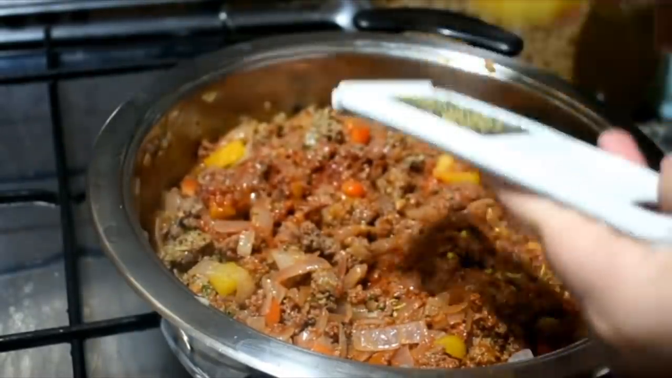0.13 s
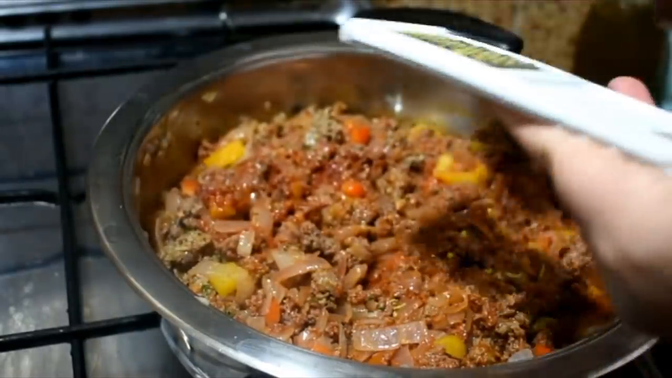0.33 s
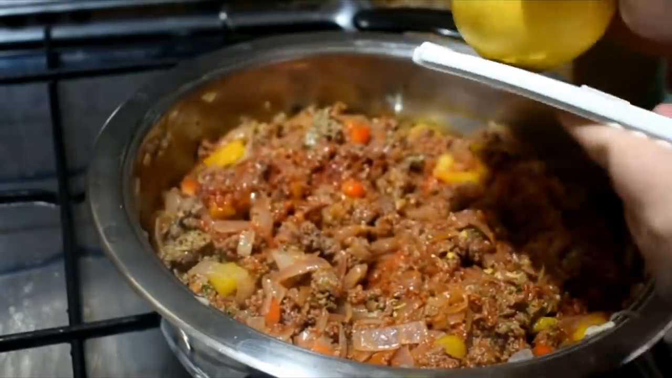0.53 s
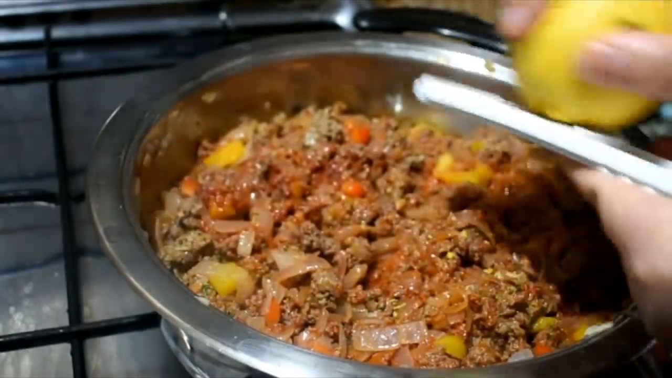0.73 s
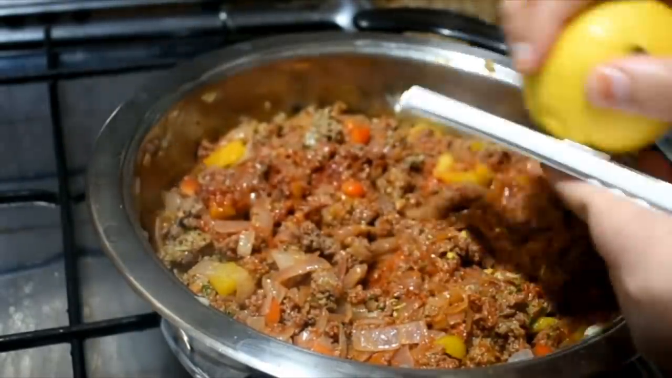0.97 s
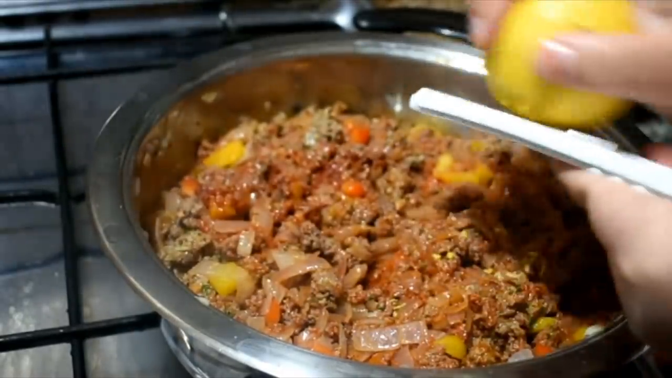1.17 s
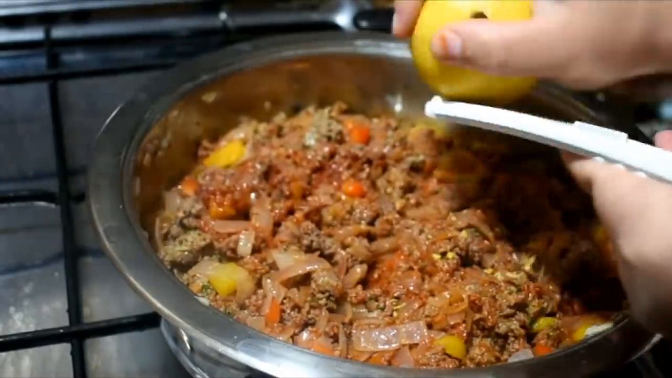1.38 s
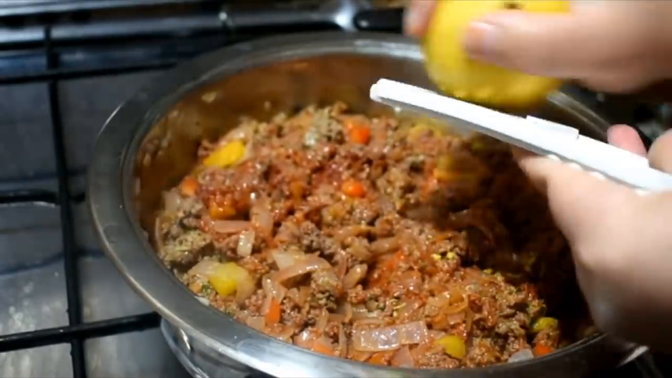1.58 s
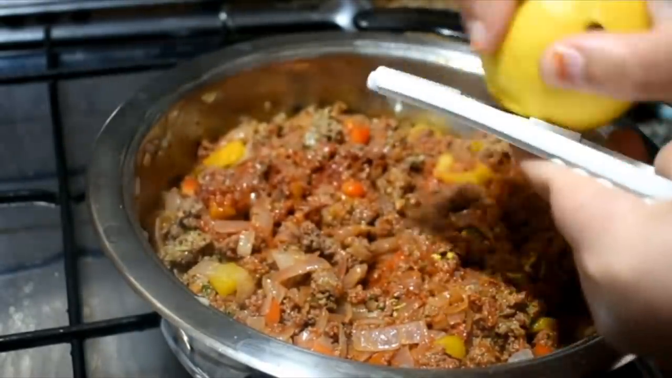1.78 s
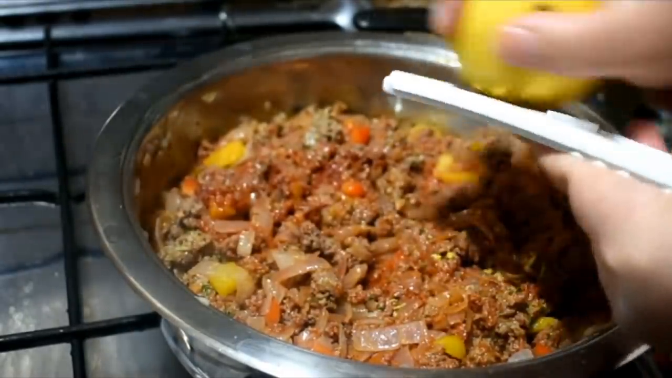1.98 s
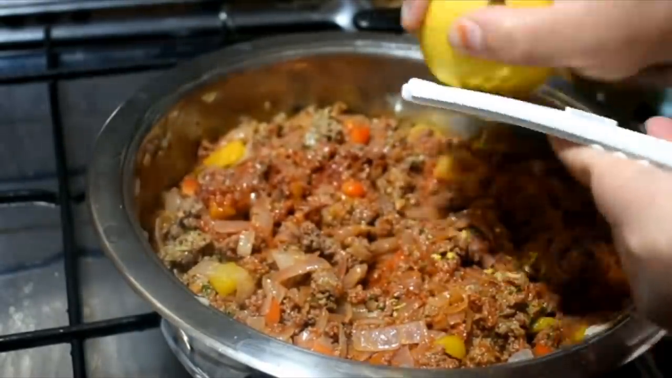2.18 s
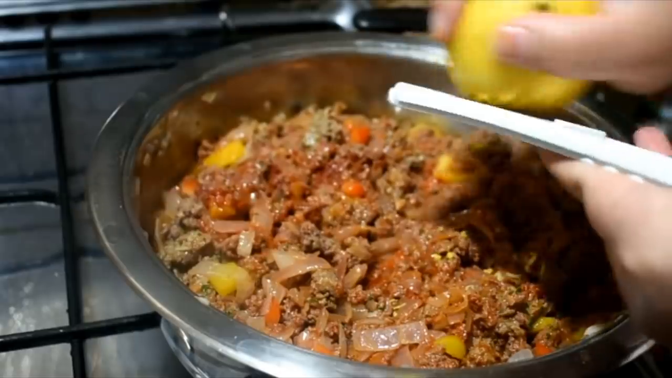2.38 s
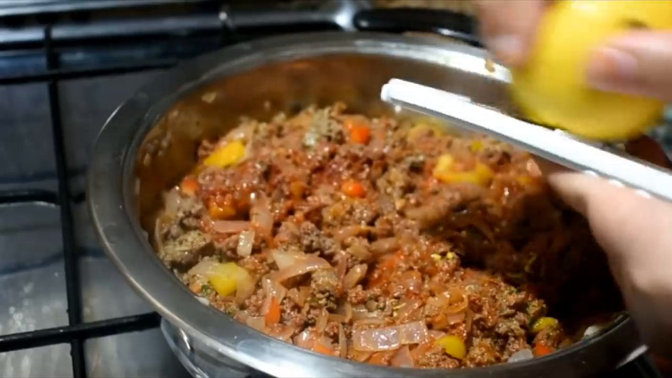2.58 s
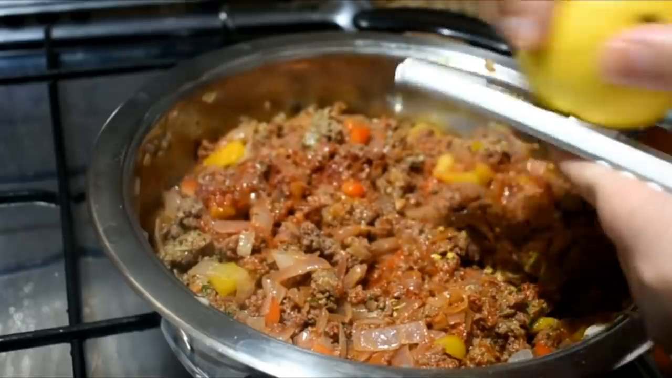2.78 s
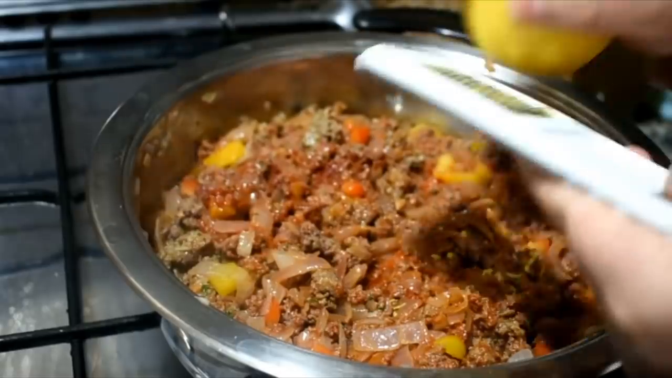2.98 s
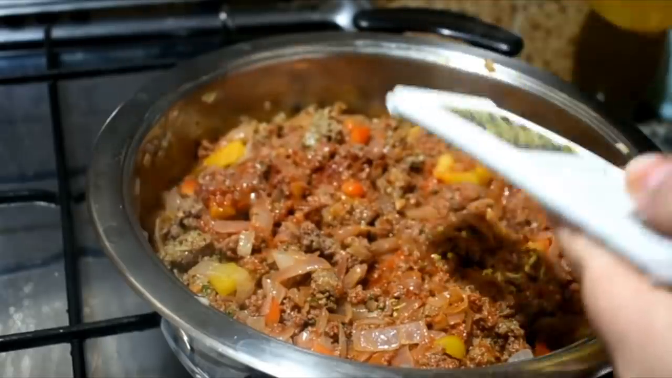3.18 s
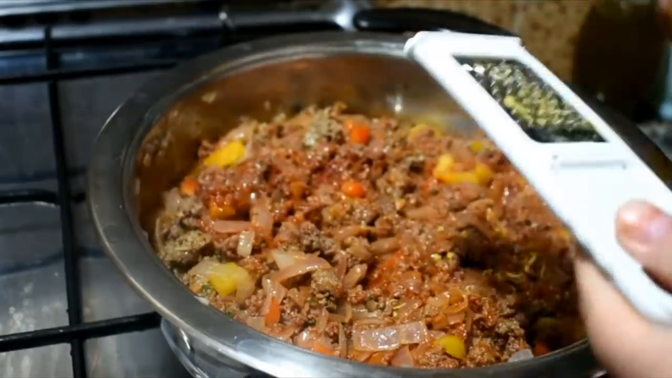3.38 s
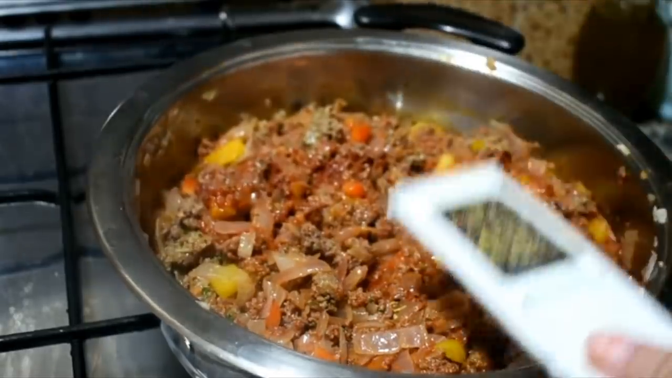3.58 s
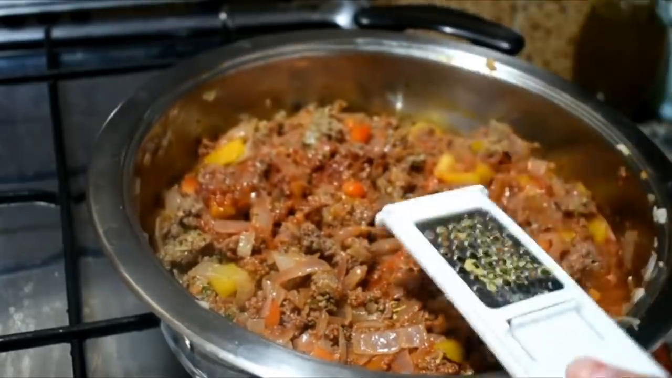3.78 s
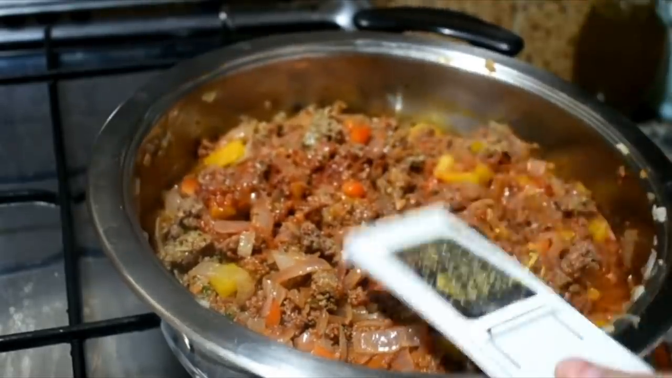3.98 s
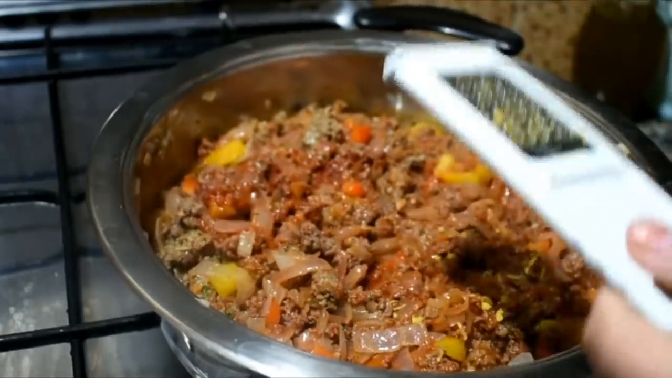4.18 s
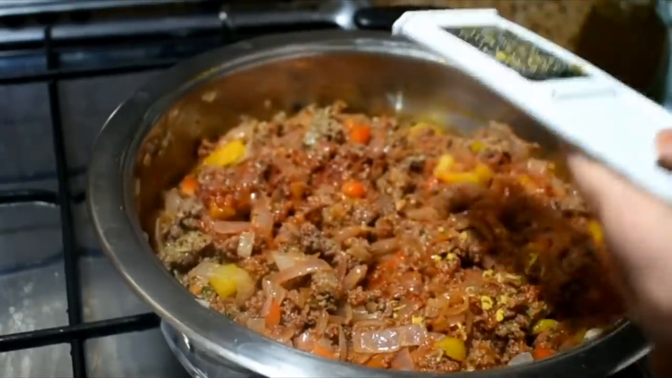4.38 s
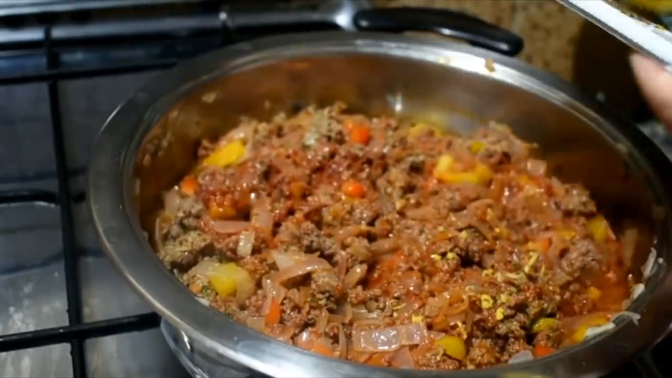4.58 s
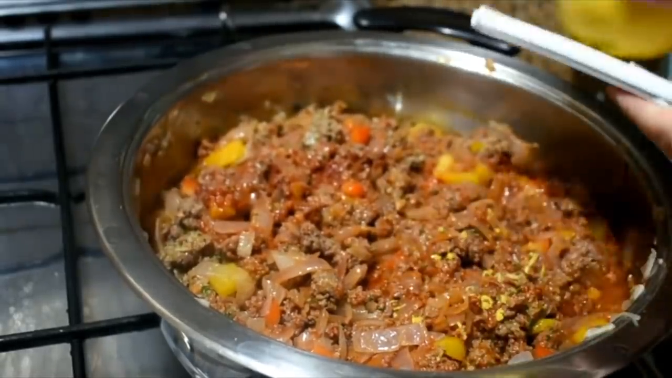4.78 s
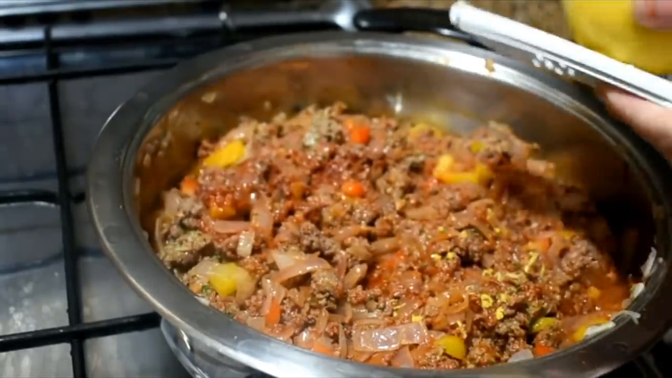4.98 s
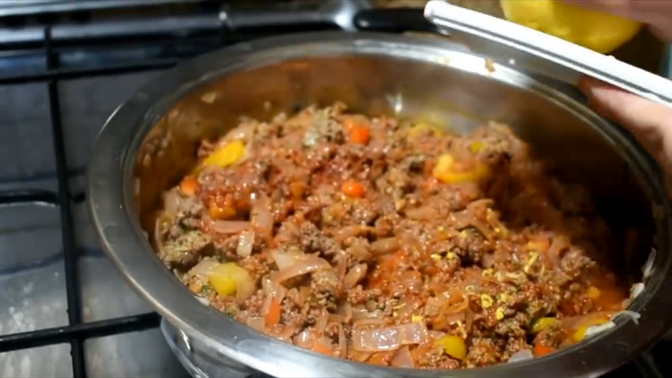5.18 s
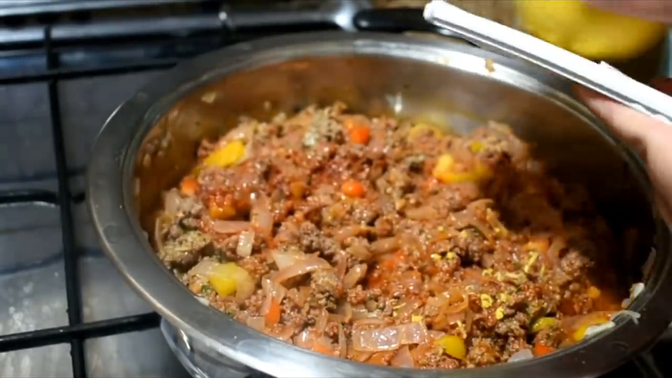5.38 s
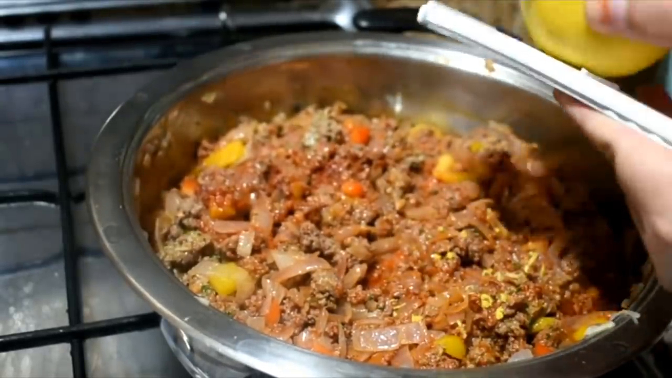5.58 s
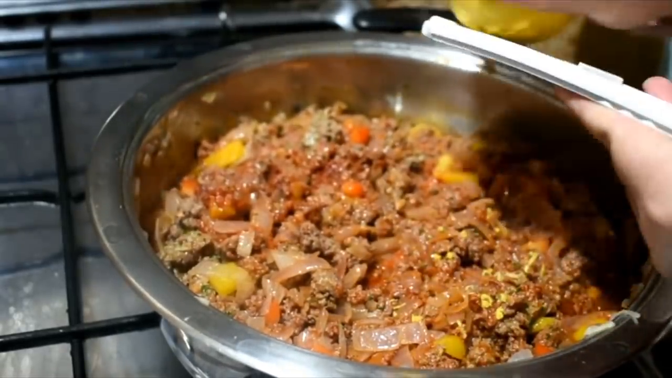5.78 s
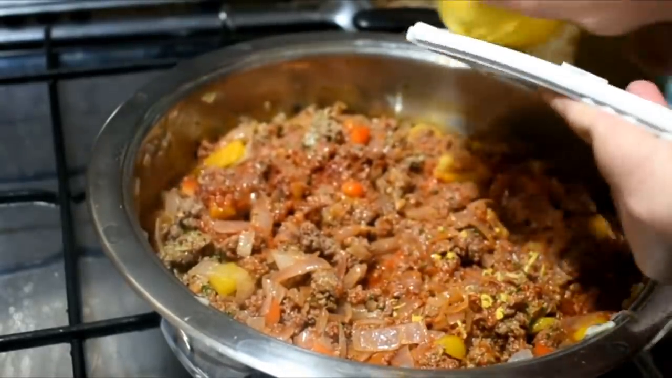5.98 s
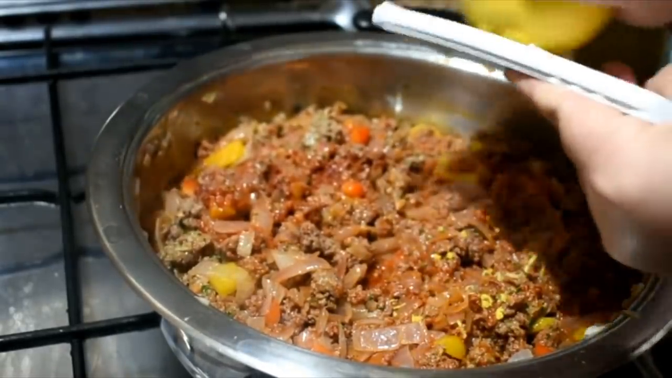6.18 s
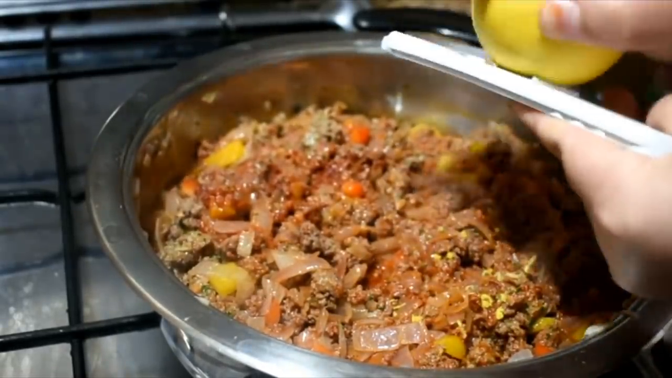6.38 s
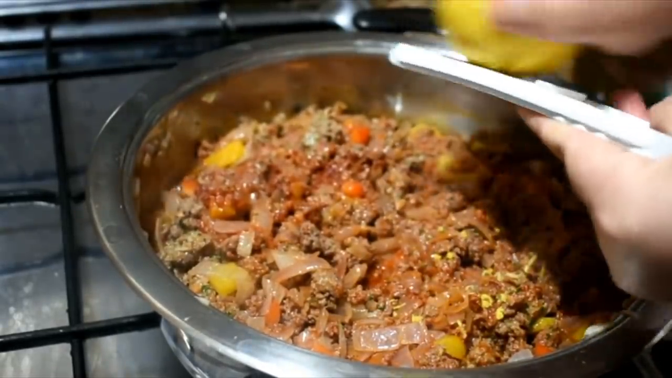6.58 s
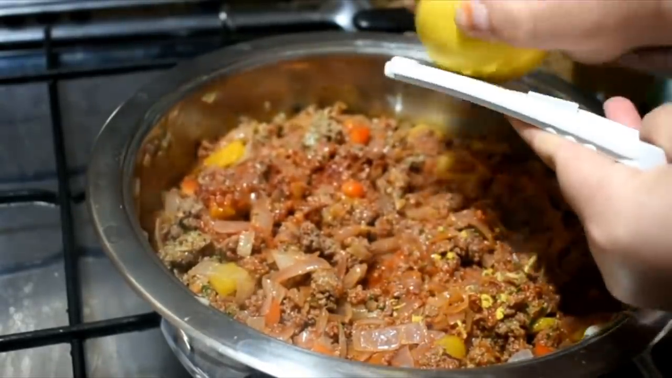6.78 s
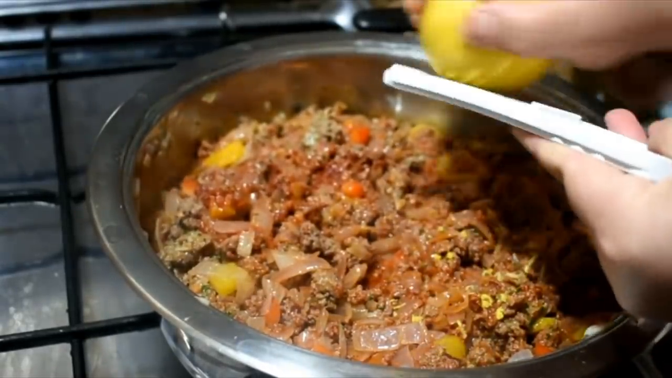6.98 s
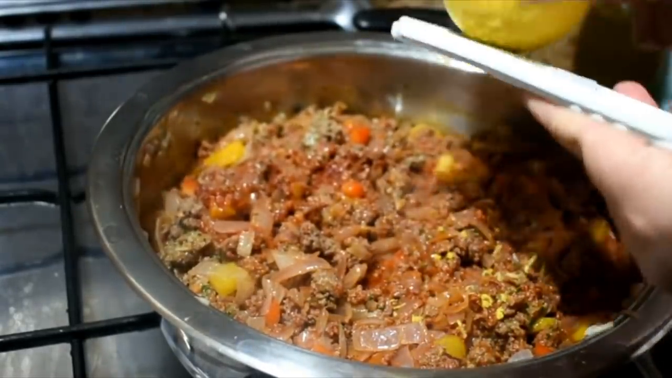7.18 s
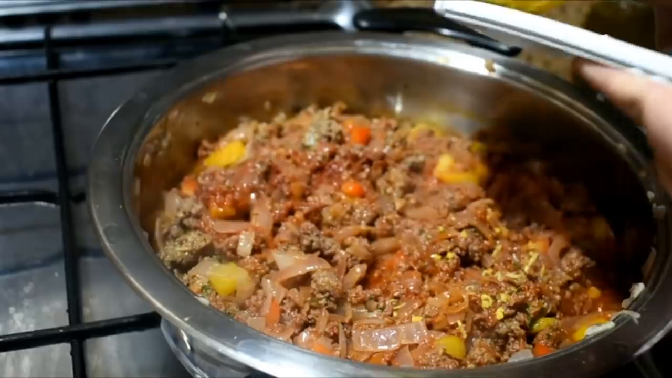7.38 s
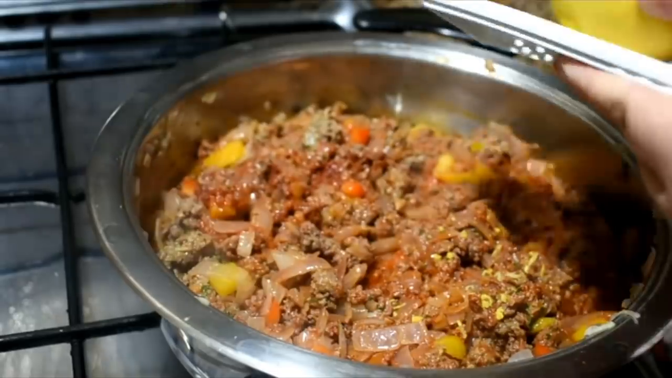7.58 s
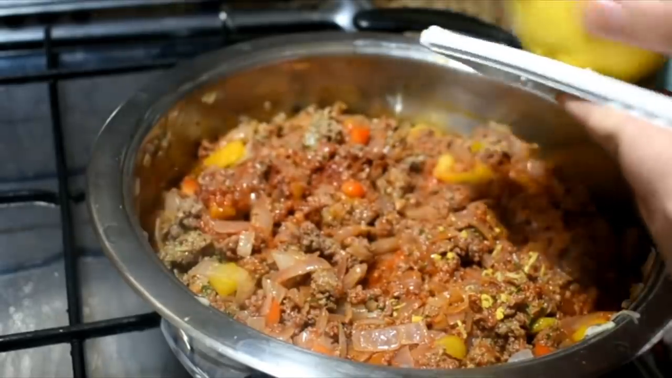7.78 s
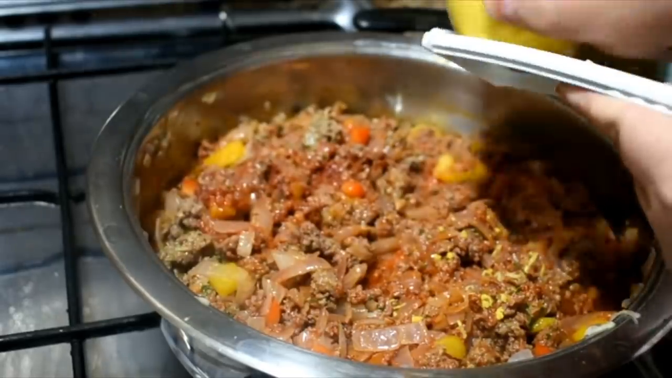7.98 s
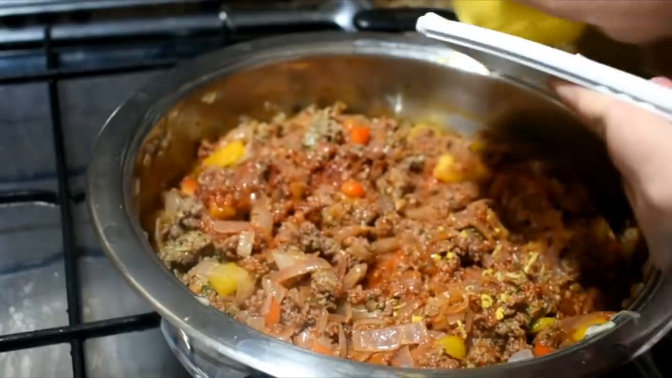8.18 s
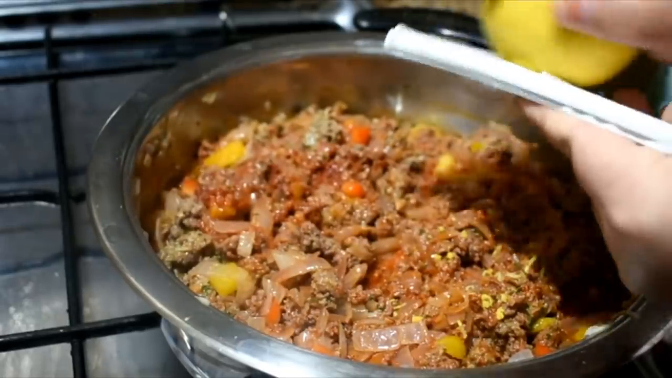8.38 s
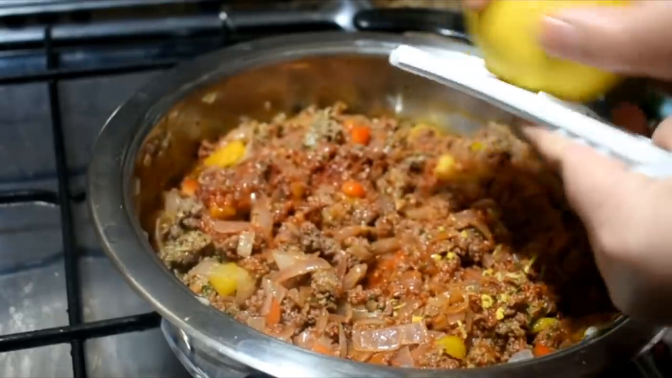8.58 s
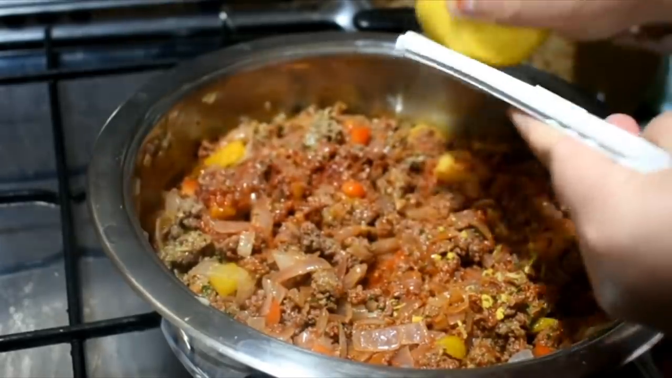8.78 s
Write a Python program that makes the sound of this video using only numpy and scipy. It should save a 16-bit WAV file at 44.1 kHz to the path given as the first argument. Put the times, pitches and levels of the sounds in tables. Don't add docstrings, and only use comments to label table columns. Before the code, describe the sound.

A close, thin-bass microphone in a kitchen with steady extractor air, a faint motor hum and a thin whine. From about 0.3 s a lemon is rubbed on a fine handheld grater: dry, bright rasps under a tenth of a second, strong cutting strokes roughly every quarter second, with quieter return scrapes between and occasional tiny fibre snaps. At 2.5 s the strokes stop. Loud raps of the plastic frame on the steel pan rim crack at 3.1, 3.4 and 3.6 s, the first with a quick bounce, ringing briefly; duller, gritty knocks of the pan on the iron grid come between and after, one sharper at 3.7 s, with a low blurred thud beneath. Small knocks trail to 4.1 s. Light scraping resumes at 4.4 s, strengthens by 5.5 s, breaks briefly around 6.6 to 7 s, then continues evenly until about 8.3 s. The hum fades, ending in silence near 8.8 s.

```python
import sys
import numpy as np
from scipy import signal
from scipy.fft import rfft, irfft, next_fast_len
from scipy.io import wavfile
from scipy.ndimage import uniform_filter1d

SR = 44100
rng = np.random.default_rng(int(sys.argv[2]) if len(sys.argv) > 2 else 0)


def rack_gain(trim_db):
    fader = np.asarray(trim_db, float)
    return 10 ** (fader / 20)


def to_wav(s):
    ch = np.atleast_2d(s).T
    pcm = np.round(np.clip(ch, -1, 1) * 32767)
    wavfile.write(sys.argv[1], SR, pcm.astype(np.int16))


N = 390108

T = np.arange(N) / SR
SIZE = next_fast_len(N + SR)
HZ = np.maximum(np.arange(SIZE // 2 + 1) * SR / SIZE, 1)
TOP_HZ = 15800

# (time [s], peak [dB], rattle [s], treble [dB], thud [dB])
RAPS = [
    (3.125, -6.5, 0.011, -2.5, -8.5),
    (3.136, -12.5, 0.005, -5, -7.5),
    (3.16, -26, 0.011, -3.5, 18),
    (3.368, -7, 0.017, 1, -2.5),
    (3.597, -7, 0.0091, 1.5, 2),
    (3.619, -23.5, 0.006, -11, 9),
]
# (time [s], peak [dB], treble [dB], grit [dB], thud [dB])
ROCKS = [(3.224, -29, -9, 3, 17), (3.295, -21, 1.5, 4, -10), (3.519, -17.5, 9, 1, -5.5),
         (3.568, -22.5, 2, -4, 9), (3.649, -26.5, -6, 0, 11), (3.689, -24, -14, -5, 0),
         (3.720, -13.5, 16.5, 9, -13.5), (3.737, -27, 16, 11, -14), (3.9, -42, 9, -3.5, 13),
         (4.09, -27.5, 0, -7, 8.5), (4.596, -34, -3, 1, 11), (4.823, -39, -7, -1, 5)]


def unit(x):
    return x / np.sqrt(np.mean(x ** 2))


def shape(points):
    hz, db = np.transpose(points)
    return rack_gain(np.interp(np.log(HZ), np.log(hz), db))


def bumps(peaks):
    return np.sqrt(1 + sum(rack_gain(2 * db) / (1 + (2 * (HZ - hz) / wide) ** 2) for hz, wide, db in peaks))


def causal(gain):
    cepstrum = irfft(np.log(gain + 1e-6), SIZE)
    cepstrum[1:SIZE // 2] *= 2
    cepstrum[SIZE // 2 + 1:] = 0
    return np.exp(rfft(cepstrum))


def colour(x, gain):
    return irfft(rfft(x, SIZE) * gain, SIZE)[:N]


def walk(rate):
    hold = int(SR / rate)
    steps = np.repeat(rng.standard_normal(N // hold + 1), hold)
    return unit(uniform_filter1d(steps, hold)[:N])


def add(out, start, sound):
    i = int(start * SR)
    out[i:i + len(sound)] += sound[:N - i]


def decay(t, t60):
    return np.exp(-np.log(1000) * t / t60)


def zesting():
    # (frequency [Hz], level [dB per Hz])
    teeth = [(350, -23), (600, -9.5), (812, -20.5), (881, -17), (1180, -7), (2090, -4), (2610, -4),
             (3630, -6.5), (3990, -4), (4910, -6), (10300, -11.5), (14100, -18.5), (16000, -31.5)]
    # (frequency [Hz], width [Hz], level [dB])
    plate_modes = [(2630, 200, -2), (3500, 250, -2), (4050, 250, 0), (4580, 150, -3), (5140, 150, -3),
                   (9090, 700, -4)]
    # (start [s], length [s], level [dB])
    cuts = [(0.375, 0.046, -47), (0.611, 0.065, -45.5), (0.877, 0.079, -48), (1.136, 0.078, -46),
            (1.425, 0.063, -44.5), (1.7, 0.063, -43), (1.951, 0.07, -43.5), (2.203, 0.068, -42.5),
            (2.452, 0.059, -43.5), (4.535, 0.066, -56.5), (4.98, 0.064, -49.5), (5.25, 0.086, -50.5),
            (5.518, 0.064, -45.5), (5.778, 0.06, -42.5), (6.024, 0.073, -46), (6.277, 0.064, -45.5),
            (6.519, 0.07, -43.5), (7.2, 0.073, -45.5), (7.458, 0.078, -46), (7.717, 0.075, -49),
            (7.983, 0.076, -47), (8.248, 0.059, -47)]
    # (start [s], length [s], level [dB])
    returns = [(0.327, 0.06, -57.5), (0.456, 0.088, -53.5), (0.754, 0.067, -52.5), (1.024, 0.064, -48),
               (1.3, 0.062, -52.5), (1.563, 0.074, -52.5), (1.814, 0.083, -49.5), (2.076, 0.071, -48.5),
               (2.337, 0.057, -49), (4.410, 0.04, -54), (4.664, 0.045, -55.5), (4.853, 0.05, -60),
               (5.097, 0.07, -55.5), (5.38, 0.083, -55.5), (5.616, 0.1, -55), (5.894, 0.07, -50),
               (6.155, 0.062, -51), (6.404, 0.059, -52), (7.027, 0.13, -55.5), (7.308, 0.094, -52),
               (7.572, 0.089, -52.5), (7.846, 0.077, -52.5), (8.12, 0.064, -52)]
    # (time [s], level [dB])
    weight = [(.35, -2.5), (.8, -0.5), (2.5, 0.5), (4.5, -3.5), (5.3, -6), (5.9, -0.5), (6.5, -2),
              (7.2, -2), (8.3, -2)]
    # share of the stroke spent rising, plate body dB, tearing dB
    cut, back = (0.25, -5.5, -3), (0.37, -3.5, -3.1)
    skim_tear = 0.3

    plate = shape(teeth) * bumps(plate_modes)
    grip_db = 0.72 * walk(70)
    parts = np.zeros((3, N))
    for centre in 600 * 2 ** (np.arange(20) / 4):
        patch_db = 0.9 * walk(30) + 2.2 * walk(150)
        clicks = rng.standard_normal(N) * rack_gain(3.0 * np.minimum(rng.standard_exponential(N), 6))
        share = np.exp(-(4 * np.log2(HZ / centre)) ** 2 * 1.4)
        layer = 1 if centre < 3000 else 2 if centre > 8000 else 0
        parts[layer] += rack_gain(patch_db + grip_db) * colour(clicks, plate * share)

    push = np.zeros((3, N))
    strokes = [(*row, *cut) for row in cuts] + [(*row, *back) for row in returns]
    for start, length, db, bite, body_db, tear_db in strokes:
        weight_db = np.interp(start, *np.transpose(weight))
        u = np.linspace(0, 1, int(1.34 * length * SR))
        rise = np.sin(np.pi / 2 * np.minimum(u / bite, 1)) ** 1.42
        swell = rise * np.cos(np.pi / 2 * u ** 2.9) ** 2.54
        for row, extra_db in zip(push, (0, body_db + weight_db, tear_db - skim_tear * weight_db)):
            add(row, start - 0.001, swell * rack_gain(db + extra_db + 1.0))
    push += np.array([[0.16], [0.16], [0.24]]) * uniform_filter1d(push, int(0.16 * SR), axis=1)
    return sum(unit(part) * level for part, level in zip(parts, push))


def snags():
    # (time [s], peak [dB], frequency [Hz])
    fibres = [(0.025, -30.5, 2150), (0.3965, -35, 4350), (0.409, -31, 4440), (0.531, -36, 2130),
              (0.952, -18.5, 9000), (1.1404, -24.5, 4350), (1.3437, -24, 4250), (1.344, -26, 12000),
              (1.879, -32, 4300), (0.668, -26, 9000), (2.214, -21, 6230), (4.4229, -31.5, 5000),
              (4.5644, -33, 3630), (4.587, -28.5, 7000), (5.0942, -30, 8200), (5.269, -29.5, 4600),
              (5.5316, -25, 10200), (5.905, -26.5, 9050), (6.531, -36, 3970)]
    out, t = np.zeros(N), np.arange(600) / SR
    for (start, db, hz), noise in zip(fibres, rng.standard_normal((len(fibres), 600))):
        band = signal.butter(2, [hz / 1.2, min(hz * 1.36, 18000)], "band", fs=SR, output="sos")
        tick = unit(signal.sosfilt(band, noise)) + 0.3 * np.gradient(noise)
        tick *= t / 0.0031 * np.exp(1 - t / 0.0022)
        add(out, start - 0.0015, tick * rack_gain(db - 14.5))
    return out


def ring(hz, modes, luck, rise, treble_db, scatter_db):
    t, hz = np.arange(SR // 3)[:, None] / SR, np.array(hz)
    db, t60 = np.transpose(modes)
    gain = rack_gain(db + scatter_db * luck[0] + treble_db * np.log2(hz / 2000) / 2)
    waver = 1 + 0.4 * np.sin(2 * np.pi * (40 + 15 * luck[2]) * t + 3 * luck[3])
    swing = (1 - np.exp(-t / rise)) * decay(t, np.maximum(t60, 0.01) * rack_gain(2.1 * luck[4])) * waver
    swing *= np.cos(1.5 * np.pi * t)
    return (swing * np.sin(2 * np.pi * hz * t + 3 * luck[1])) @ gain


def chatter(length, noise):
    t = np.arange(len(noise)) / SR
    push = noise * np.minimum(t / 0.0026, 1) * np.exp(-(t / length) ** 2)
    return push / np.sqrt(np.sum(push ** 2))


def raps():
    rim_hz = [620, 1132, 1481, 1869, 1891, 2424, 2502, 2719, 3020, 3146, 3227, 3465, 3640, 3890, 4134, 4630,
              5861, 6160, 7180, 7503, 7970, 8807, 10410, 11195, 12000, 12830]
    # (level [dB], t60 [s])
    rim = [(-16, 0.12), (-8, 0.092), (-14, .2), (-7, 0.34), (-9, 0.3), (-10, 0.2), (-18, 0.27), (-21.5, .2),
           (-19, .1), (-4.5, 0.11), (-5.5, 0.28), (-22.5, 0.16), (-13.5, 0.089), (-7.5, .14), (-17.5, 0.24),
           (-26, 0.17), (-14.5, .1), (-5, 0.28), (-11, 0.17), (-19.5, .18), (-7, 0.11), (-18.5, 0.12),
           (-20, .16), (-23, 0.16), (-17, 0.077), (-25, .14)]
    # (frequency [Hz], level [dB per Hz])
    crack_tone = [(180, -53.5), (300, -27), (1800, -9), (2100, -14), (3230, -7.5), (4380, -11.5),
                  (6030, -13), (13000, -16), (15400, -31.5), (16500, -55.5)]
    # (frequency [Hz], width [Hz], level [dB])
    frame = [(1930, 280, -0.5), (3170, 170, 14), (6080, 230, 7.5), (7700, 480, -2.5)]
    settled_s, settled_db, settled_t60, pair_hz = 3.3, -8, -0.1, 1880
    pair = np.abs(np.array(rim_hz) - pair_hz) < 50

    out, crack = np.zeros(N), np.zeros(N)
    for (start, db, length, treble_db, _), luck in zip(RAPS, rng.standard_normal((len(RAPS), 200, 30))):
        damped = np.array(rim) + np.outer((start > settled_s) * pair, (settled_db, settled_t60))
        blow = ring(rim_hz, damped, luck[:, :len(rim)], length / 3, treble_db, scatter_db=4.2)
        add(out, start, rack_gain(db - 13.0) * blow)
        add(crack, start, rack_gain(db + 32) * chatter(length, luck.ravel()))
        add(crack, start, rack_gain(db + 14.5) * chatter(0.022, luck.ravel()[::-1]))
    return out + colour(crack, causal(shape(crack_tone) * bumps(frame)))


def rocks():
    grid_hz = [680, 915, 1340, 1568, 2130, 2435, 2680, 3160, 3760, 4490, 5450, 6200, 7250]
    # (level [dB], t60 [s])
    grid_modes = [(-11, .07), (-3, .08), (-9, .08), (-8, .09), (-11, .06), (-4, .08), (1, .09), (-8, .05),
                  (-15, .03), (-16, .03), (-19, .025), (-17, .025), (-19, .025)]
    out, grit, wake = np.zeros((3, N))
    for (start, db, treble_db, grit_db, _), luck in zip(ROCKS, rng.standard_normal((len(ROCKS), 300, 30))):
        knock = ring(grid_hz, grid_modes, luck[:, :len(grid_modes)], 0.0011, treble_db, scatter_db=-0.4)
        add(out, start - 0.002, rack_gain(db - 9.5) * knock)
        add(grit, start - 0.002, rack_gain(db + 13.5 + grit_db) * chatter(0.0087, luck.ravel()))
        add(wake, start, rack_gain(db + 16) * chatter(0.053, luck.ravel()[::-1]))
    body = bumps([(875, 130, 7.2), (1490, 370, 4.6), (2590, 710, 5.5)]) / (1 + (450 / HZ) ** 4)
    gritty = colour(grit, causal(body / (1 + (HZ / 4300) ** 4)))
    shudder = colour(wake, causal(body / (1 + (HZ / 3300) ** 6)))
    return out + gritty + shudder


def belly():
    # (frequency [Hz], level [dB per Hz])
    low_body = [(60, -35), (120, -18), (170, -9.5), (225, -2.5), (268, 5), (322, -3.5), (450, -10.5),
                (700, -3), (1200, -41.5)]
    push, t = np.zeros(N), np.arange(SR) / SR
    for start, db, *_, thud_db in RAPS + ROCKS:
        add(push, start, rack_gain(db + thud_db) * (1 - np.exp(-t / 0.045)) * decay(t, 0.82))
    return rack_gain(-35) * push * unit(colour(rng.standard_normal(N), shape(low_body)))


def extractor():
    # (frequency [Hz], level [dB per Hz])
    air_tone = [(15, -58.5), (25, -46.5), (64, -38), (92, -26.5), (180, -19.5), (200, -15), (277, -7),
                (405, -11.5), (818, -8.5), (887, -7), (1190, -8), (1700, -7.5), (1940, -7.5), (9320, -15.5),
                (16000, -31.5)]
    # (frequency [Hz], width [Hz], level [dB])
    duct = [(224.3, 5.1, 4.5), (268, 27, -5), (582, 14, 9), (763, 52, 6.5), (965, 22, 4.5), (1224, 79, 4.5)]
    # (frequency [Hz], level [dB])
    hum = [
        (98.03, -88.5),
        (99.97, -93),
        (214.8, -79),
        (830.25, -64.8),
    ]
    air = colour(rng.standard_normal(N), shape(air_tone) * bumps(duct)) * rack_gain(0.5 * walk(3))
    tones = sum(np.sqrt(2) * rack_gain(db) * np.cos(2 * np.pi * hz * (T - 0.35)) for hz, db in hum)
    return rack_gain(-52.5) * unit(air) + tones


def room(x):
    # (frequency [Hz], t60 [s])
    kitchen = [(150, 0.682), (500, 0.65), (1400, 0.6), (3700, 0.24), (9000, 0.45), (15000, 0.076)]
    t, tail = np.arange(SR) / SR, np.zeros(SR)
    hz, t60 = np.transpose(kitchen)
    for centre in 90 * 2. ** np.arange(8):
        octave = np.exp(-np.log2(HZ / centre) ** 2 / 0.5) / (1 + (200 / HZ) ** 4)
        band = colour(rng.standard_normal(N), octave)[:SR]
        tail += band * decay(t, np.interp(np.log(centre), np.log(hz), t60))
    tail *= 1 - np.exp(-t / 0.0088)
    return signal.fftconvolve(x, tail / np.sqrt(np.sum(tail ** 2)))[:N]


def scene():
    hands = zesting() + snags()
    knocks = raps() + rocks()
    echoes = room(rack_gain(-12.0) * hands + rack_gain(-9) * knocks)
    quiet = hands + echoes + belly() + extractor()
    return (colour(quiet, HZ < TOP_HZ) + colour(knocks, 1 / (1 + (HZ / 16100) ** 80)))[None]


def top_cut(x):
    return signal.sosfilt(signal.butter(12, 16620, fs=SR, output="sos"), x)


def record(dry):
    # (time [s], level [dB])
    fade_points = [(0, 0.5), (8.28, 0.5), (8.4, -4), (8.6, -5.5), (8.776, -8), (8.783, -50), (8.79, -140),
                   (8.85, -140)]
    bent = np.tanh(dry / 0.78) * 0.82 - dry
    bent = signal.sosfilt(signal.butter(2, 400, "high", fs=SR, output="sos"), bent)
    bent = signal.sosfilt(signal.ellip(8, 0.5, 70, TOP_HZ, fs=SR, output="sos"), bent)
    fade = rack_gain(np.interp(T, *np.transpose(fade_points)))
    return top_cut((dry + bent) * fade)


dry = scene()
out = record(dry)
to_wav(out)
```